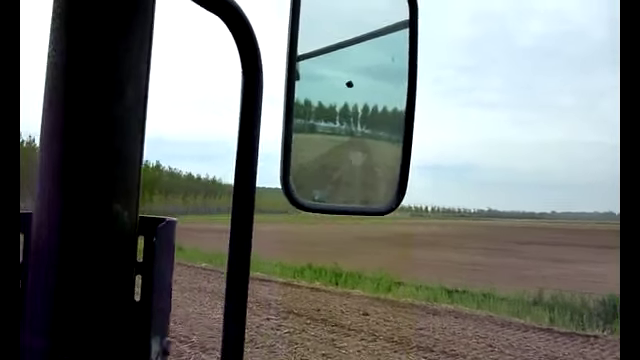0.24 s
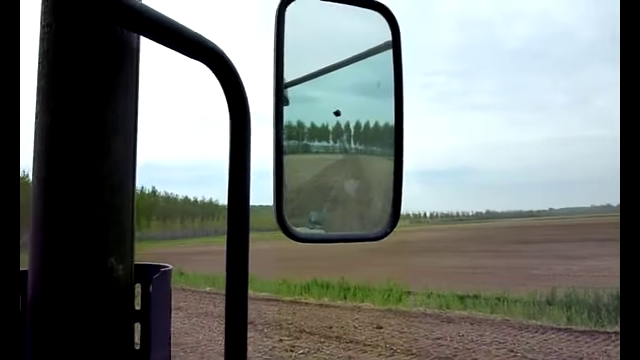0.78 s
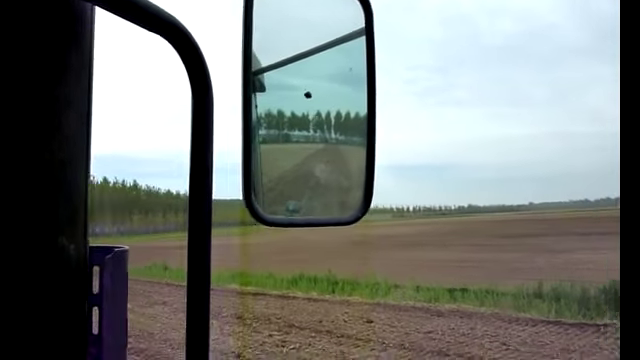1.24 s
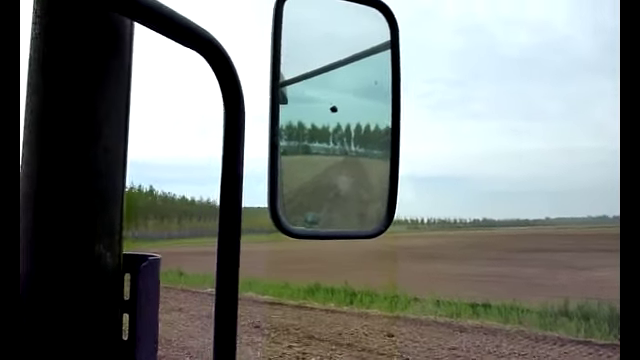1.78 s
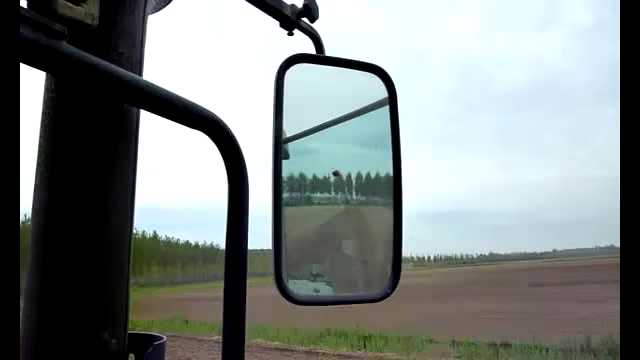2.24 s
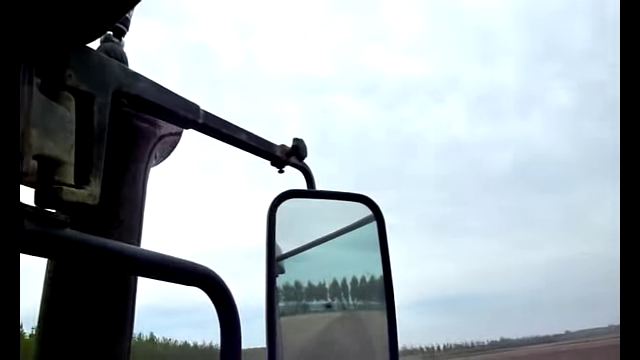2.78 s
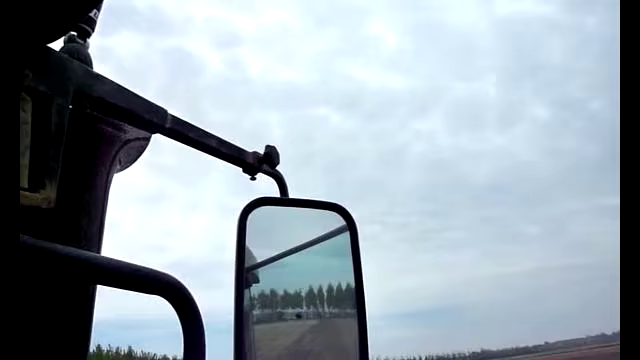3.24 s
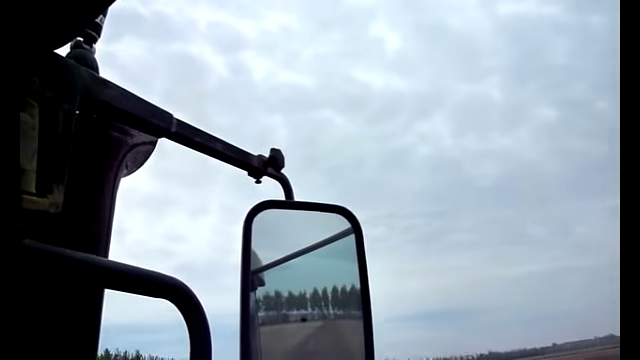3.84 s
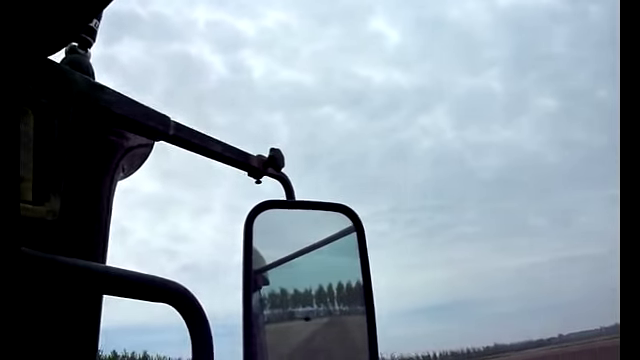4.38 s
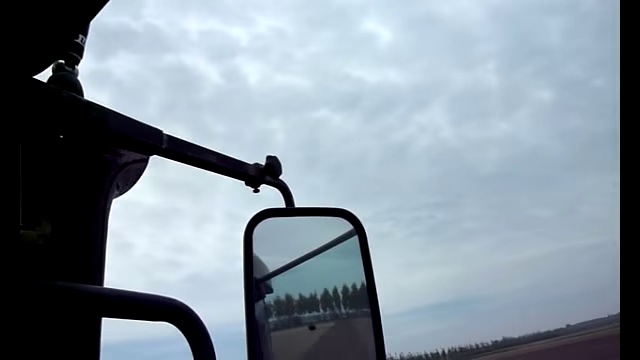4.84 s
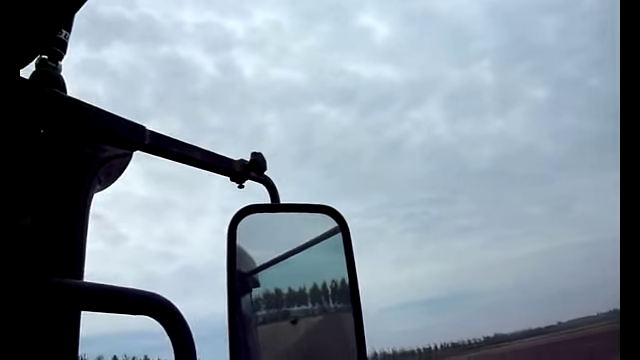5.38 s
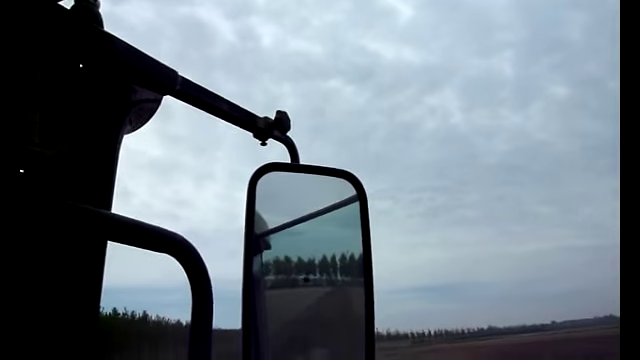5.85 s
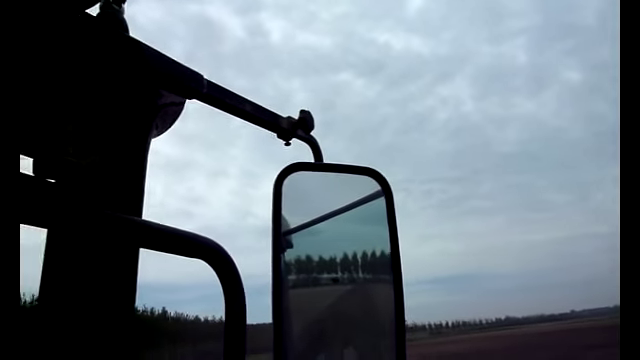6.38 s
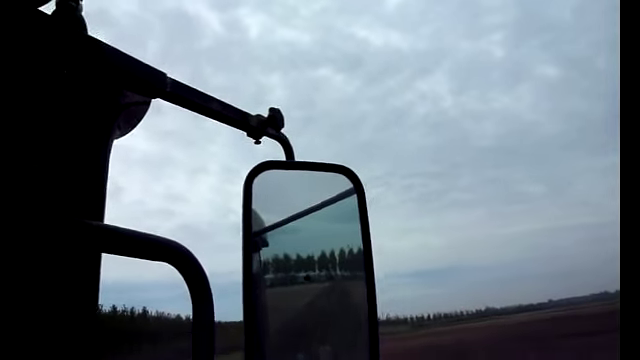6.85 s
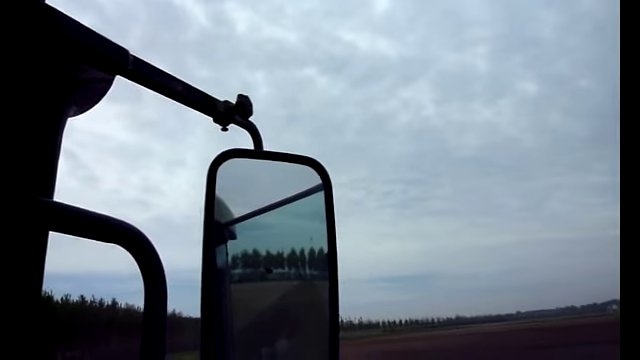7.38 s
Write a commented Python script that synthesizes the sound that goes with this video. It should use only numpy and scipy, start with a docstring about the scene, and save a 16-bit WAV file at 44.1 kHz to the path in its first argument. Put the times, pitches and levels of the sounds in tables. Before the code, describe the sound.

A diesel tractor engine runs under load, heard from inside the cab. A deep booming drone carries a knocking clatter and growl, with light ticking, hiss and a faint thin turbo whistle over a low chassis rumble. The engine sinks in pitch and the clatter eases, then it climbs back to its earlier speed. The tone shifts slightly as the hand-held microphone moves.

```python
"""Inside the cab, a six-cylinder diesel tractor pulls an implement. At first it runs free: the firings
boom, combustion knock rings the cab's resonances, unequal cylinders growl, and injectors and valves
tick and hiss, with a thin turbo whistle, over the rumble of the chassis. The engine lugs down in heavy
soil and the clatter eases. From 2.3 s the hand-held microphone tilts upward, changing the colour. From
about 4 s the engine recovers; near 6 s the microphone shifts, and by 7 s speed and clatter are back."""
import sys
import numpy as np
from scipy import signal
from scipy.fft import rfft, irfft, next_fast_len
from scipy.io import wavfile
from scipy.ndimage import uniform_filter1d

SR = 44100
rng = np.random.default_rng(int(sys.argv[2]) if len(sys.argv) > 2 else 0)


def dump_mix(stems):
    """Bounce the given channels to the path in sys.argv[1] as a 16-bit WAV at rate SR."""
    frames = np.atleast_2d(stems).T  # one column per channel
    limited = np.clip(frames, -1, 1)  # hard clip at full scale
    pcm = np.round(limited * 32767).astype(np.int16)
    wavfile.write(sys.argv[1], SR, pcm)


N = 336042
TIME = np.arange(N) / SR


# low standing wave of the cab: f/Hz, width/Hz, lift/dB
BOOM_MODE = [(170.7, 57, 15)]
def boom(firings, firing_hz, tone_db, octave_db, waver_db):
    """Forced oscillation: each firing dips the cab's pressure; the octave swells near resonance."""
    angle = 2 * np.pi * firings
    resonance_db = lifts(2 * firing_hz, BOOM_MODE)
    tone = undb(tone_db + waver_db * walk(12)) * np.cos(angle)
    octave = undb(octave_db + resonance_db + waver_db * walk(12)) * np.cos(2 * angle)
    return np.sqrt(2) * (tone - octave)


# standing waves of the cab: f/Hz, width/Hz, lift/dB
CAB_MODES = [(250.4, 11, 4), (303.7, 15, 8.5), (382.6, 26, 6), (452, 20, 6.5), (529.5, 22, 8.5),
             (603.6, 20, 8.5), (680.7, 28, 9.5), (764, 24, 10), (849, 34, 6), (919, 28, 5), (1008, 32, 8.5),
             (1130, 36, 6.5), (1224, 34, 5), (1311, 37, 3.5), (1386, 27, 5.5), (1491, 24, 5)]
# spectrum of the knock at each pose of the microphone: f/Hz, relative level/dB
KNOCK_AHEAD = [(60, -59.5), (130, -52), (250, -54), (350, -53.5), (520, -48), (680, -46.5), (790, -50.5),
               (880, -56), (1030, -55.5), (1200, -50), (1350, -49.5), (1480, -61), (1650, -54.5),
               (2100, -63.5), (3000, -94.5), (8000, -140)]
KNOCK_TILTED = [(60, -62.5), (130, -55), (250, -50.5), (350, -53), (520, -53), (680, -49), (790, -46),
                (900, -48), (1010, -49.5), (1110, -59), (1300, -52), (1540, -51.5), (1750, -63),
                (2100, -72.5), (3000, -96), (8000, -140)]
KNOCK_SHIFTED = [(60, -58.5), (130, -52), (250, -49.5), (350, -53), (520, -48.5), (680, -45.5),
                 (790, -45.5), (900, -50), (1010, -53.5), (1110, -55), (1220, -51), (1500, -50.5),
                 (1680, -57.5), (2100, -58), (3000, -99.5), (8000, -140)]
def knock(firings):
    """Impulse excitation: combustion blows ring the block and the standing waves of the cab."""
    blows = bursts(firings, start=0.1994, decay=0.5, floor=1.5, scatter_db=1.8, repeat=0.07)
    spectra = (KNOCK_AHEAD, KNOCK_TILTED, KNOCK_SHIFTED)
    return blend_poses([colour(blows, spectrum, CAB_MODES) for spectrum in spectra])


# harmonics of the four-stroke cycle rate: order, relative level/dB
GROWL_ORDERS = [(2, -50), (7, -47.5), (8, -47), (9, -37.5), (10, -42), (11, -49.5), (13, -51.5),
                (14, -46.5), (15, -38), (16, -54), (17, -54.5), (18, -37), (20, -42.5), (21, -41),
                (22, -50.5), (23, -52), (24, -51), (28, -43), (30, -41.5), (36, -38.5), (44, -35.5),
                (48, -36), (49, -37), (50, -42), (52, -46.5), (54, -44.5), (56, -42.5), (58, -43)]
def growl(firings, waver_db, smear_rad, mode_depth, gain_db):
    """Fourier series: unequal cylinders give harmonics of the cycle, each swelling at a cab mode."""
    cycles = firings / len(CYLINDERS)
    cycle_hz = np.gradient(cycles) * SR
    angle = 2 * np.pi * cycles + smear_rad * walk(14)  # crankshaft torsion blurs the higher orders
    f = np.arange(SR // 20)
    cab_gain = undb(mode_depth * lifts(f, CAB_MODES))
    harmonics = 0
    for order, db in GROWL_ORDERS:
        swell = unit(np.interp(order * cycle_hz, f, cab_gain))
        amplitude = swell * undb(db + waver_db * walk(4))
        harmonics += amplitude * np.cos(order * angle + rng.uniform(0, 2 * np.pi))
    return np.sqrt(2) * undb(gain_db) * harmonics


# spectrum of injectors and valves: f/Hz, relative level/dB
INJECTOR_SPECTRUM = [(200, -29.5), (1200, -17), (1850, -1.5), (2230, -1.3), (2650, -4.8), (3130, -5.2),
                     (4000, -7), (4800, -9.8), (5500, -14.3), (6300, -20.2), (6800, -30), (7400, -45),
                     (8000, -59.5)]
# treble resonances of the cab, and a thin turbo whistle near 4.6 kHz: f/Hz, width/Hz, lift/dB
TREBLE_AHEAD = [(3000, 120, 1), (3670, 77, 1.5), (3990, 90, 3), (4640, 85, 7), (6430, 170, 2)]
# treble peaks with the microphone tilted up: f/Hz, width/Hz, lift/dB
TREBLE_TILTED = [(2220, 130, 3.5), (3000, 110, 3), (3190, 86, 4.5), (3900, 60, 3.5), (4184, 64, 3.6),
                 (4660, 150, 2.5)]
def injectors(firings):
    """Impact noise: injectors and valves tick over a hiss; one narrow peak is the turbo's whistle."""
    ticks = bursts(firings, start=0.72, decay=0.65, floor=1.64, scatter_db=3.0, repeat=0.12)
    ticks = reflections(ticks, t60=0.07, wet_db=-14.0) * undb(0.21 * walk(12))
    pose_peaks = (TREBLE_AHEAD, TREBLE_TILTED, ())
    return blend_poses([colour(ticks, INJECTOR_SPECTRUM, peaks) for peaks in pose_peaks])


# spectrum of tyres and chassis: f/Hz, relative level/dB
RUMBLE_SPECTRUM = [(15, -22), (40, 1.5), (55, -2.5), (80, 0.5), (120, 10.5), (160, 13), (215, 14),
                   (290, 1.5), (450, -37)]
def chassis(level_db, swell_db):
    """Structure-borne sound: tyres and implement shake the cab over uneven ground."""
    return colour(rng.standard_normal(N), RUMBLE_SPECTRUM) * undb(level_db + swell_db * walk(5))


# cylinders in firing order, one hard blow per turn of the crankshaft: relative level/dB
CYLINDERS = [2.4, -2, -.6, 2.2, -1.4, -.8]
def bursts(firings, start, decay, floor, scatter_db, repeat):
    """Exponential decay: one noise burst per firing, over a floor; start and decay in firing periods."""
    count = len(CYLINDERS)
    position = firings - start + count
    blow = position.astype(int)
    scatter = scatter_db * rng.standard_normal(blow.max() + 1)[blow]
    strength = undb(np.array(CYLINDERS)[blow % count] + scatter)
    envelope = floor + strength * np.exp(-(position % 1) / decay)
    # the same parts strike at the same crank angles, so a share of the power repeats every cycle
    pattern = rng.standard_normal(2048)
    cycle_phase = position / count % 1
    periodic = unit(np.interp(cycle_phase * len(pattern), np.arange(len(pattern)), pattern))
    return envelope * (np.sqrt(repeat) * periodic + np.sqrt(1 - repeat) * rng.standard_normal(N))


def reflections(x, t60, wet_db):
    """Reverberation: the cab's windows add a dense tail that falls 60 dB in t60 seconds."""
    t = TIME[:4096]
    tail = rng.standard_normal(len(t)) * undb(-60 * t / t60)
    return x + undb(wet_db) * signal.fftconvolve(x, tail / np.linalg.norm(tail))[:N]


# path of the microphone: t/s, pose (0 ahead, 1 tilted up, 2 shifted)
MIC_POSE = [(2.3, 0.023), (2.85, 0.67), (3.6, 1), (5.55, 0.9), (6.1, 1.79)]
def blend_poses(choices):
    """Spatial variation of the field: the moving microphone blends one sound or level per pose."""
    pose = curve(MIC_POSE)
    return sum(np.maximum(1 - abs(pose - k), 0) * x for k, x in enumerate(choices))


def colour(x, spectrum, resonances=()):
    """Minimum-phase filtering: a broad spectrum with narrow resonances on top; output rms 1."""
    size = 2 * next_fast_len(N // 2 + 4096)
    f = np.arange(size // 2 + 1) * SR / size
    hz, db = np.transpose(spectrum)
    gain = undb(np.interp(np.log(f + 1), np.log(hz), db) + lifts(f, resonances))
    # folding the cepstrum makes the resonances ring only after each blow
    cepstrum = irfft(np.log(gain))
    cepstrum[1:size // 2] *= 2
    cepstrum[size // 2 + 1:] = 0
    response = np.exp(rfft(cepstrum))
    padded = np.pad(x, (size - N, 0), mode="reflect")
    return unit(irfft(rfft(padded) * response)[-N:])


def lifts(f, resonances):
    """Resonance: the decibels that Lorentzian peaks add at the frequencies f."""
    return sum(lift / (1 + (2 * (f - centre) / width) ** 2) for centre, width, lift in resonances)


def low_pass(x, hz):
    """Elliptic filtering: a steep cut above hz."""
    return signal.sosfilt(signal.ellip(8, 0.2, 70, hz, fs=SR, output="sos"), x)


def walk(rate):
    """Slow random fluctuation: values held 1 / rate seconds and smoothed twice; rms 1."""
    hold = int(SR / rate)
    steps = np.repeat(rng.standard_normal(N // hold + 1), hold)
    return unit(uniform_filter1d(uniform_filter1d(steps, hold), hold)[:N])


def curve(table):
    """Linear interpolation of a time table."""
    return np.interp(TIME, *np.transpose(table))


def undb(db):
    """Decibels to amplitude ratio."""
    return 10 ** (np.asarray(db) / 20)


def unit(x):
    """Normalisation to rms 1."""
    return x / np.sqrt(np.mean(x ** 2))


# firing rate, sinking under load and recovering: t/s, f/Hz
FIRING_RATE = [(0.0, 98.68), (0.8, 94.14), (1.4, 89.83), (2.15, 85.83), (2.68, 84.03), (3.25, 84.57),
               (3.78, 83.49), (4.85, 86.83), (5.8, 91.5), (6.86, 97.75), (7.62, 97.84)]
# base levels of the lugging engine, a row per pose: tone/dB, octave/dB, knock/dB, injectors/dB
POSE_LEVELS = [(-16.4, -33.7, -18.9, -32), (-17, -33.1, -19.5, -32.9), (-16.8, -32.9, -19.2, -32.7)]
def scene():
    """Superposition: all engine sounds follow one crankshaft; slow running booms, fast clatters."""
    lug_hz, free_hz = 84, 98
    tone_rise_db, knock_rise_db, tick_rise_db = -1.4, 2, 3.3  # from lugging to running free
    firing_hz = curve(FIRING_RATE)
    firings = np.cumsum(firing_hz * (1 + 0.001 * walk(9))) / SR  # phase, counted in firings
    pace = np.maximum((firing_hz - lug_hz) / (free_hz - lug_hz), 0) ** 1.6  # 0 lugging, 1 running free
    tone_db, octave_db, knock_db, tick_db = (blend_poses(column) for column in np.transpose(POSE_LEVELS))
    cab = boom(firings, firing_hz, tone_db + tone_rise_db * pace, octave_db, waver_db=0.34)
    cab += growl(firings, waver_db=1.5, smear_rad=0.008, mode_depth=0.97, gain_db=0.27)
    cab += undb(knock_db + knock_rise_db * pace) * knock(firings)
    cab += undb(tick_db + tick_rise_db * pace) * injectors(firings)
    return (cab + chassis(level_db=-33.6, swell_db=4))[None]


def record(dry):
    """Band limiting: a narrow-band microphone, then the faint hiss of its electronics."""
    microphone = low_pass(dry, hz=7300)
    hiss = undb(-75) * rng.standard_normal(N)
    return low_pass(microphone + hiss, hz=11800)


dry = scene()
out = record(dry)
dump_mix(out)
```